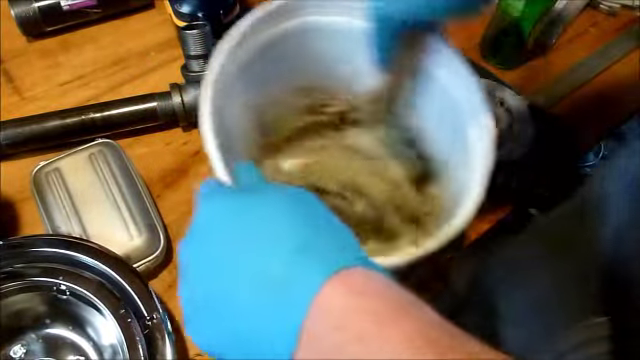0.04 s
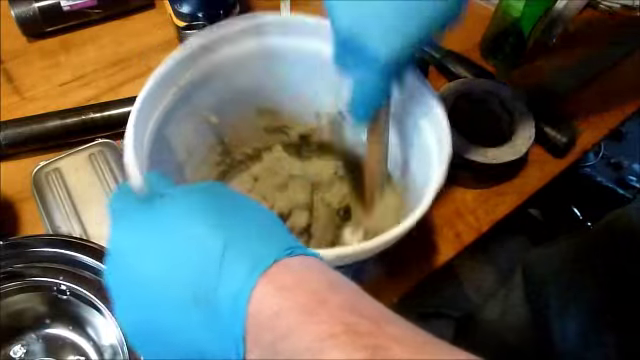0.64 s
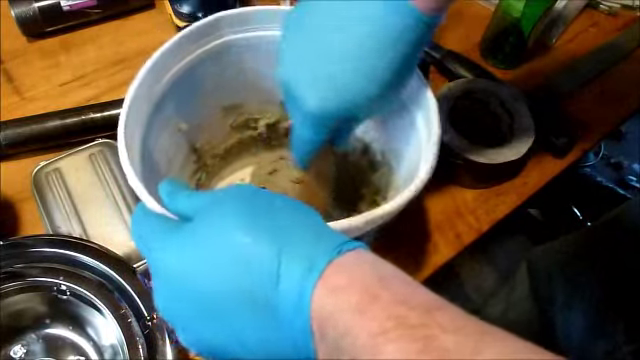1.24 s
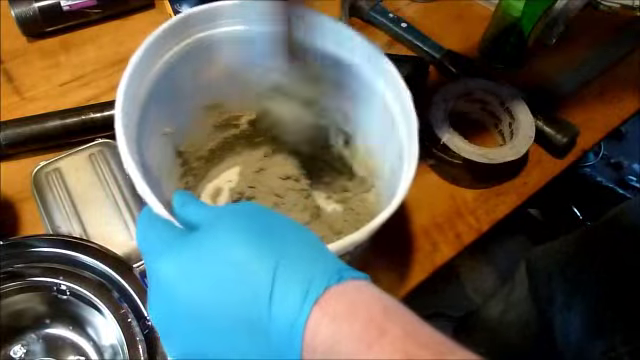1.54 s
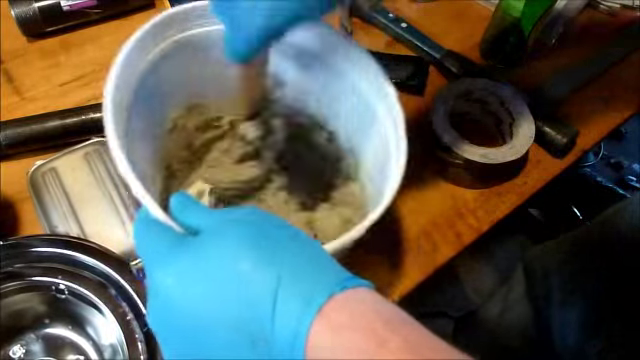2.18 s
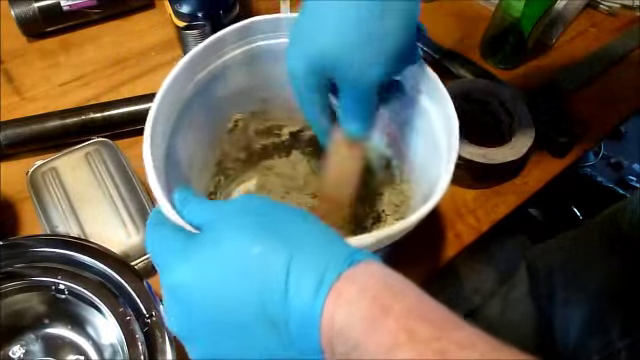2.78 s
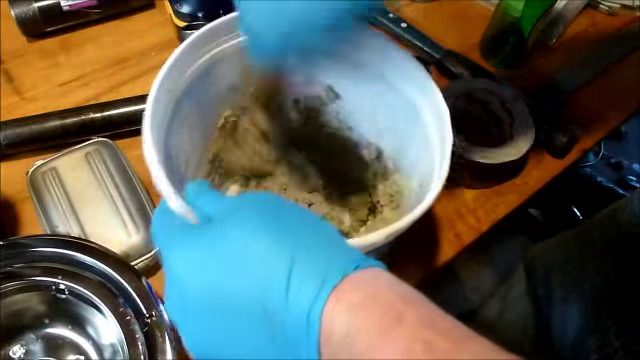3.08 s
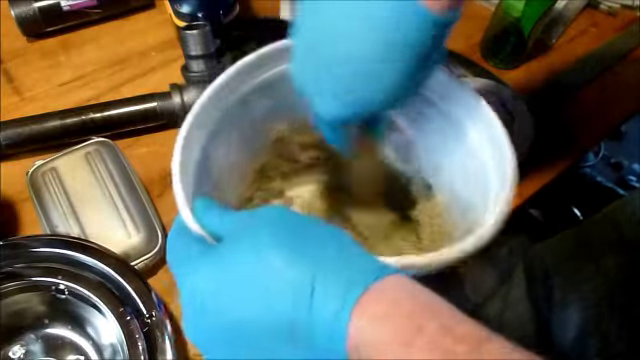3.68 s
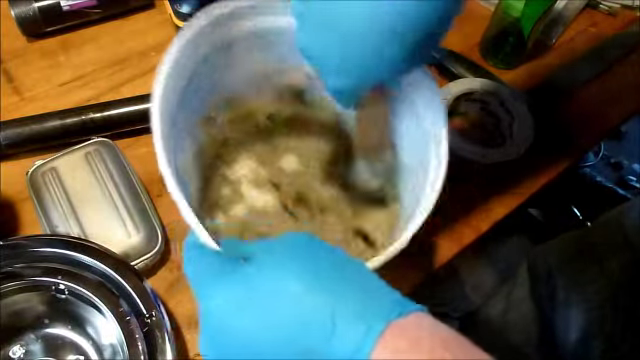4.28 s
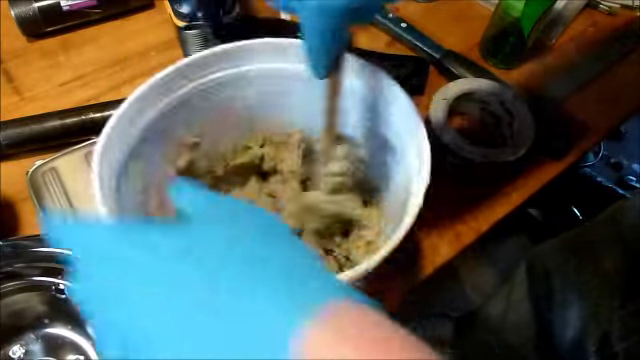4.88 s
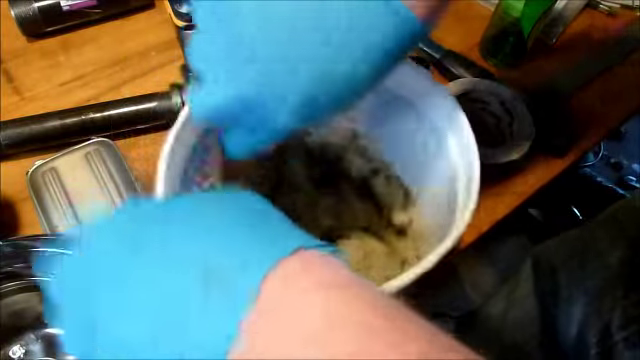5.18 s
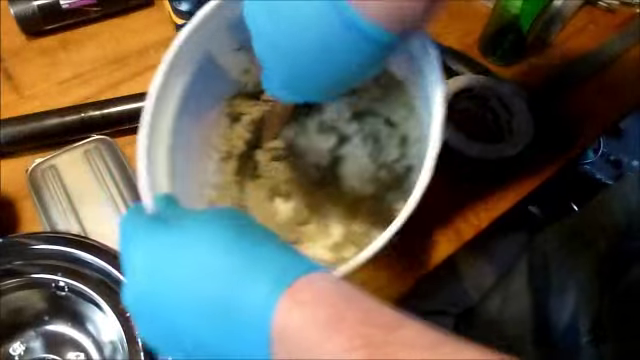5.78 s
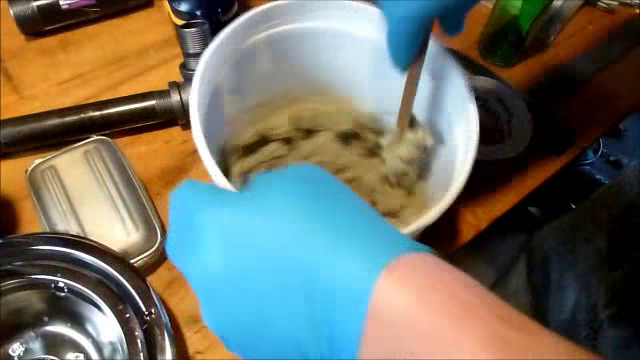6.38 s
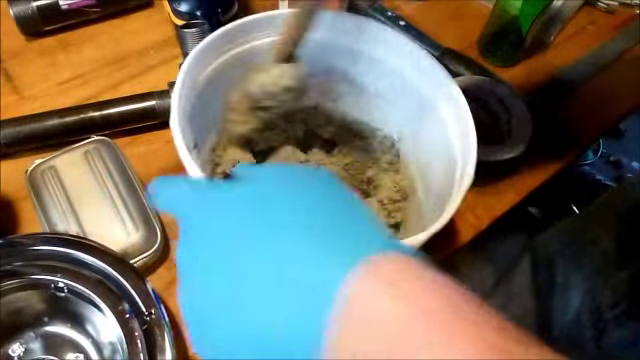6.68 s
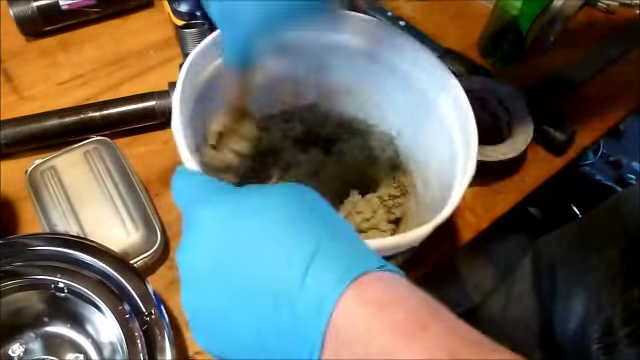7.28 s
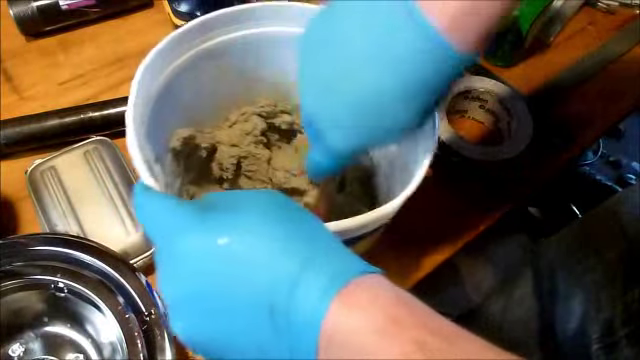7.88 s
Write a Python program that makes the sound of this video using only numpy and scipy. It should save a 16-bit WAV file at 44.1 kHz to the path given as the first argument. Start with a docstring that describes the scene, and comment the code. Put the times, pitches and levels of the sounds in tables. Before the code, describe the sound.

A wooden stick stirs wet clay in a hollow plastic tub, with gritty scraping, dull booms and irregular knocks against the sides.

```python
"""A wooden stick stirs wet clay in a plastic tub, held on a bench in a small, briefly echoing workshop.
From the start the stick catches and slips: gritty clay hisses along the wall and the hollow tub booms.
Soon knocks on the wall, ticks of grit and short groans join in, and they keep coming throughout.
Near 4.8 s comes a hard knock, and around 5.5 s the tub's base slaps the bench.
Another hard knock lands at 6.4 s, and a quick run of knocks fills the last of the eight seconds."""
import sys
import numpy as np
from scipy import signal
from scipy.fft import rfft, irfft
from scipy.io import wavfile
from scipy.ndimage import uniform_filter1d, map_coordinates

SR = 44100
rng = np.random.default_rng(int(sys.argv[2]) if len(sys.argv) > 2 else 0)


def master(y):
    """Save y as 16-bit WAV."""
    cut = np.clip(np.atleast_2d(y).T, -1, 1)
    pcm = np.round(cut * 32767)  # scale
    wavfile.write(sys.argv[1], SR, pcm.astype(np.int16))


N = 355005

# A mode is a note an object rings at. A t60 is the time a sound takes to fade by 60 dB.
# Knocks of the stick on the tub; booms() and clacks() shift the thud and clack levels further:
# start_s, boom_db, clack_db, thud_db (added to boom_db), ring_factor, boom_hz, wall_hz, contact_s
KNOCKS = [(0.222,-24.5,-37,6,1,350,2200,0.033), (0.675,-29,-27,4,.8,328,2150,0.026),
          (0.767,-20.5,-31,-7,0.54,338,1600,0.029), (0.893,-21.5,-33.5,4,1.4,386,1480,0.008),
          (1.009,-10,-22,1,1.9,335,3150,0.0052), (1.671,-12,-30,-2,1.44,381,2200,0.014),
          (2.362,-18.5,-42,-4,1.24,377,2400,0.023), (3.074,-25,-35,7.5,0.71,347,2100,.035),
          (3.196,-12.5,-33,-3,0.79,393,2900,.03), (3.58,-19.5,-33,-3,1.3,360,1490,0.04),
          (3.667,-16.5,-28.5,-9,0.97,377,3000,0.041), (3.876,-14,-44,-4.5,1.2,328,950,0.034),
          (4.477,-16.5,-42,0,1.4,358,2100,0.017), (4.7761,-1.5,-18,-8,1.66,350,2070,0.0084),
          (5.161,-20,-29,2.5,0.77,382,2500,0.056), (5.485,-13.5,-30,1.5,0.62,430,1400,0.022),
          (5.552,-17.5,-33,-4,0.59,444,1150,0.019), (6.3661,-8.5,-31.5,-23,1.4,380,2400,0.031),
          (6.4266,-1,-24.5,-7,0.78,350,1530,0.0058), (7.184,-21,-33.5,8,0.84,370,2200,0.028),
          (7.2496,-8.5,-25,-17,0.54,360,1150,0.0093), (7.498,-7,-28.5,-21,0.55,396,1150,0.018),
          (7.525,-4.5,-17,-12,0.64,367,2500,0.0081), (7.741,-10,-28,-8.5,0.73,320,1300,0.014),
          (7.876,-13,-24.5,-7,0.63,295,1620,0.013)]
# Modes of the clay-filled tub: pitch_hz, t60_s, level_db
TUB_MODES = [(222,0.045,-8), (254,0.048,-6.5), (298.6,0.033,1.5), (346,0.037,2.5), (379.3,0.049,4),
             (429.7,0.11,-9), (476.5,0.19,-9.5), (527.5,0.076,-19)]
# Modes of the bench top: pitch_hz, t60_s, level_db
BENCH_MODES = [(110, 0.063, -17), (133.7, 0.3, 2), (160.8, 0.12, 0)]
# Modes of the tub's thin wall: pitch_hz
WALL_MODES_HZ = [967, 1179, 1517, 1825, 2124, 2338, 2844, 3420, 4660, 5960, 6600]
# Tone colour of a clack on the wall: frequency_hz, level_db
CLACK_COLOUR = [(300, -24), (700, -0.5), (1100, 1.5), (1450, -0.5), (2400, -4.5), (3400, -2), (4500, -15.5),
                (8000, -41.5)]

TOP_HZ = 7800  # the finished sound is cut off above this


def undb(db):
    """Turn decibels into a number to multiply by."""
    return 10 ** (np.asarray(db) / 20)


def unit(x):
    """Scale a signal to an average strength (rms) of 1."""
    return x / np.sqrt(np.mean(x ** 2))


def seconds(length):
    """The time of each sample in a short sound."""
    return np.arange(int(length * SR)) / SR


def fade(t, t60):
    """Die away by 60 dB every t60 seconds."""
    return np.exp(-np.log(1000) * t / t60)


def add(track, start_s, sound):
    """Mix a sound into a track at a given time."""
    i = max(int(start_s * SR), 0)
    track[i:i + len(sound)] += sound[:max(N - i, 0)]


def through(x, response):
    """Pass a signal through an object, given that object's response to one click."""
    return signal.oaconvolve(x, response)[:len(x)]


def cut(x, order, hz, kind):
    """Keep the "low" part, the "high" part or a "band" of a sound."""
    return signal.sosfilt(signal.butter(order, hz, kind, fs=SR, output="sos"), x)


def colour(points, size=1024):
    """Turn a tone colour into a click response with energy 1."""
    hz, db = np.transpose(points)
    grid_hz = np.fft.rfftfreq(size, 1 / SR) + 1
    curve_db = np.interp(np.log(grid_hz), np.log(hz), db)
    cepstrum = irfft(np.log(undb(curve_db)))
    # folding the second half onto the first moves the energy to the start of the response
    cepstrum[1:size // 2] *= 2
    cepstrum[size // 2 + 1:] = 0
    response = irfft(np.exp(rfft(cepstrum)))
    return response / np.linalg.norm(response)


def ring(modes, stretch=0.69, push_s=0.0035):
    """A struck body's modes build up during the push, then fade; stretch multiplies their t60."""
    t = seconds(.4)
    y = sum(undb(db) * fade(t, t60 * max(stretch, .2)) * np.cos(2 * np.pi * hz * t)
            for hz, t60, db in modes)
    y *= 1 - np.exp(-t / push_s)
    y = cut(y, 3, 0.5 * modes[0][0], "high")  # little sound comes out below the lowest mode
    return y / np.abs(y).max()


def wander(per_s):
    """A curve that slides to a new random value per_s times a second; rms 1."""
    hold = int(SR / per_s)
    steps = np.repeat(rng.standard_normal(N // hold + 1), hold)
    return unit(uniform_filter1d(steps, hold)[:N])


def slips(per_s, spread_db):
    """Tiny slips, each a click of random time and size; rms 1."""
    size = undb(spread_db * np.minimum(rng.exponential(size=N), 5))
    return unit((rng.random(N) < per_s / SR) * size * rng.choice([-1, 1], N))


def burst(t60, tail_db, tail_t60):
    """Noise of one contact: the edge skids for a moment, then the wall shivers; energy 1."""
    t = seconds(.15)
    skid = fade(np.maximum(t - t60 / 6, 0), t60)
    shiver = undb(tail_db) * fade(t, tail_t60)
    y = rng.choice([-1, 1], len(t)) * (skid + shiver)
    return y / np.linalg.norm(y)


def glide(length, start_hz, end_hz, waver, per_s):
    """A tone that swells and fades, sliding in pitch and wavering as the grip changes."""
    t = seconds(length)
    hz = np.linspace(start_hz, end_hz, len(t)) * (1 + waver * wander(per_s)[:len(t)])
    swell = np.sqrt(np.abs(np.sin(np.pi * t / length)))
    return np.sin(2 * np.pi * np.cumsum(hz) / SR) * swell


def favour(hz, spot_hz, db_per_octave):
    """A mode's gain in dB: the further from the pitch of the struck spot, the weaker it rings."""
    return -db_per_octave * np.abs(np.log2(hz / spot_hz))


def workshop():
    """The quiet, steady air of the room."""
    # Tone colour of the room: frequency_hz, level_db
    air_colour = [(25, -24.5), (65, 7), (130, -2.5), (400, 8), (700, 6.5), (2000, 3.5), (8000, -48)]
    air = through(rng.standard_normal(N), colour(air_colour, size=4096))
    return air * undb(-51.5 + 0.25 * wander(23))


def echoes(x, t60, delay_s):
    """Blurred echoes from the bench and the workshop walls."""
    t = seconds(.5)
    response = rng.standard_normal(len(t)) * fade(t, t60) * (t > delay_s)
    return through(x, response / np.linalg.norm(response))


def rocking(t60=0.59):
    """How strongly the tub rocks: every knock starts it and the hand soon stills it."""
    out = np.zeros(N)
    for start_s, boom_db, _, thud_db, *_ in KNOCKS:
        add(out, start_s, undb(boom_db + thud_db - 26.5) * fade(seconds(t60), t60))
    return out


def rubs(fall=.06, width_hz=370):
    """The stick rubs a bare patch of wall, which sings hoarsely and drops in pitch as it moves on."""
    # Rubs on bare plastic: start_s, length_s, pitch_hz, level_db
    bare_rubs = [(2.155,.07,893,-47), (4.19,0.12,1690,-48), (4.26,0.08,860,-35), (4.795,0.084,702,-42.5),
                 (5.68,.12,1710,-44.5), (6.44,.06,942,-41), (7.527,0.024,642,-35), (7.63,0.057,966,-43.5)]
    out = np.zeros(N)
    for start_s, length, hz, db in bare_rubs:
        tone = glide(length, hz * (1 + fall), hz * (1 - fall), waver=.02, per_s=160)
        roughness = cut(rng.standard_normal(len(tone)), 2, width_hz / 2, "low")
        add(out, start_s, undb(db) * unit(tone * roughness))
    return out


def judders():
    """Slips fall in step with the tub's main mode and groan; on bare plastic they squeak."""
    # Groans of the tub: start_s, length_s, pitch_hz, level_db
    groans = [(0.501,0.027,381,-24.5), (1.524,0.026,385,-30.5), (1.895,0.026,391,-23),
              (2.963,0.012,374,-26), (3.269,0.04,382,-19), (3.905,0.047,368.3,-24.5), (5.612,.045,377,-23),
              (5.68,0.08,374,-19.5), (5.733,0.013,342,-15), (6.312,0.026,379,-24), (7.014,0.028,398,-27)]
    # Thin squeaks along the wall: start_s, length_s, start_hz, end_hz, level_db
    squeaks = [(4.422,0.031,7000,7600,-49), (6.657,0.086,6000,7570,-54)]
    out = np.zeros(N)
    for start_s, length, hz, db in groans:
        add(out, start_s, undb(db) * glide(length, hz * 1.017, hz / 1.005, waver=.02, per_s=140))
    for start_s, length, start_hz, end_hz, db in squeaks:
        add(out, start_s, undb(db) * glide(length, start_hz, end_hz, waver=.011, per_s=350))
    return out * undb(2 * wander(160))


def ticks():
    """Grit cracks under the stick and the thin wall snaps back."""
    # Sharp ticks of grit and bending plastic: start_s, peak_db, pitch_hz, t60_s
    cracks = [(0.203,-26,4000,.007), (1.639,-24,4040,0.0083), (1.6456,-21,3640,0.0088),
              (1.672,-20,4970,0.0067), (2.158,-30,1890,0.023), (2.427,-24.5,3330,0.0089),
              (3.629,-24,3540,0.0068), (3.799,-29,4800,0.0037), (4.016,-26.5,4260,.004),
              (4.776,-9.5,2030,0.005), (5.396,-30,2200,.015), (5.419,-28,2500,.022),
              (5.5645,-14.5,2700,.004), (5.577,-18.5,5360,0.0077), (5.591,-23,5550,0.0074),
              (5.629,-15,2580,0.0032), (5.8462,-8,5100,0.013), (6.742,-30,3450,0.035),
              (7.525,-12.5,5360,0.011)]
    out = np.zeros(N)
    for start_s, db, hz, t60 in cracks:
        noise = burst(t60, tail_db=-9.5, tail_t60=8 * t60)
        tick = cut(noise, 2, [hz / 1.28, min(hz * 1.176, TOP_HZ)], "band")
        add(out, start_s, undb(db) * tick / np.abs(tick).max())
    return out


def grit(per_s=65, low_hz=1340, high_hz=6300):
    """Single grains crack at random, each with its own pitch and size; rms 1."""
    out, t = np.zeros(N), seconds(.02)
    for when, pitch, chance in rng.random((int(per_s * N / SR), 3)):
        hz = low_hz * (high_hz / low_hz) ** pitch
        size = undb(-2.8 * np.log(max(chance, .02)))  # big grains are rare
        add(out, when * N / SR, size * fade(t, t60=0.01) * np.sin(2 * np.pi * hz * t))
    return unit(out)


def wall_ring(spot_hz, t60, detune=.05):
    """The wall rings briefly, retuned by the struck spot and loudest near its pitch; energy 1."""
    t = seconds(.15)
    pitches = WALL_MODES_HZ * (1 + detune * rng.uniform(-0.85, 1, len(WALL_MODES_HZ)))
    gains = undb(favour(pitches, spot_hz, db_per_octave=15))
    y = sum(gain * np.sin(2 * np.pi * (hz * t + rng.random())) for hz, gain in zip(pitches, gains))
    y *= fade(t, t60)
    return y / np.linalg.norm(y)


def clacks(ring_db=-3.5, snap_db=-9.5):
    """Wood hits thin plastic: a dry clack, a short ring and a snap, blurred when clay pads the blow."""
    # Tone colour of the bright snap: frequency_hz, level_db
    snap_colour = [(1500, -8), (3000, -2.5), (4000, -6), (5000, 2.5), (6300, -1), (8000, -23.5)]
    clack, rings, snap = np.zeros((3, N))
    for start_s, _, clack_db, _, _, _, wall_hz, contact_s in KNOCKS:
        force = undb(clack_db + 23)
        add(clack, start_s, force * burst(contact_s, tail_db=-15, tail_t60=.07))
        add(rings, start_s, force * undb(ring_db) * wall_ring(wall_hz, t60=0.026 + contact_s))
        add(snap, start_s, force * undb(snap_db) * burst(contact_s, tail_db=-16, tail_t60=0.025))
    return through(clack, colour(CLACK_COLOUR)) + rings + through(snap, colour(snap_colour))


def booms(hollow_top_hz=600):
    """Each knock booms in the hollow tub and thuds into the bench; now and then the base slaps down."""
    # Slaps of the tub's base on the bench: start_s, peak_db, pitch_factor
    slaps = [(4.783, -29, 1.07), (5.486, -12, .93), (5.506, -32, 0.85), (5.553, -20, 1.14)]
    # Modes of the base against the bench: pitch_hz, t60_s, level_db
    base_modes = [(98.5, 0.097, 0.5), (558, 0.036, 15), (688, 0.078, -5)]
    tub, bench = np.zeros((2, N))
    for start_s, boom_db, _, thud_db, stretch, boom_hz, _, contact_s in KNOCKS:
        struck = [(hz, t60, db + favour(hz, boom_hz, db_per_octave=23)) for hz, t60, db in TUB_MODES]
        boom = ring(struck, stretch, push_s=0.13 * contact_s)
        thud = ring(BENCH_MODES, stretch * 0.59, push_s=0.0079)
        add(tub, start_s + 0.0005, undb(boom_db) * boom)
        add(bench, start_s + 0.0018, undb(boom_db + thud_db - 20.5) * thud)
    for start_s, peak_db, pitch_factor in slaps:
        retuned = [(hz * pitch_factor, t60, db) for hz, t60, db in base_modes]
        add(bench, start_s, undb(peak_db) * ring(retuned))
    return cut(tub, 5, hollow_top_hz, "low") + bench


def stroke(length, attack_s, release_s, build_db=0):
    """The force of one stroke: it sets in, grows by build_db over its length and lets go."""
    t = seconds(length + 8 * release_s)
    onset = np.minimum(t / attack_s, 1)
    build = undb(build_db * np.minimum(t / length - 1, 0))
    return onset * build * np.exp(-np.maximum(t - length, 0) / release_s)


def stirring(skid_s=0.015):
    """How strong the boom, rasp and hiss are over time, as sweeps, pushes and skids add their power."""
    # Light sweeps along the smeared wall, about one a turn: start_s, length_s, hiss_db
    sweeps = [(0.0, 0.22, -45.5), (0.195, 0.43, -40.5), (0.646, 0.56, -48.5), (1.22, 0.3, -44.5),
              (1.648, 0.3, -43.5), (1.907, 0.51, -47), (2.355, 0.56, -45.5), (2.98, 0.23, -49.5),
              (3.195, 0.39, -44.5), (3.604, 0.35, -46.5), (3.943, 0.41, -47.5), (4.36, 0.71, -49),
              (5.133, 0.54, -45.5), (5.47, 0.468, -44.5), (5.863, 0.26, -50.5), (6.14, 0.55, -54),
              (6.69, 0.47, -42.5), (7.152, 0.21, -45.5), (7.365, 0.43, -48.5), (7.794, 0.25, -48.5)]
    # Hard pushes through the lump of clay: start_s, length_s, boom_db, rasp_db, hiss_db
    pushes = [(0.49, 0.18, -37.5, -41, -65), (0.763, 0.025, -37, -35, -43.5),
              (1.259, 0.039, -38.5, -45, -51), (1.63, 0.056, -37, -39, -36.5),
              (1.841, 0.088, -35, -40, -61), (2.42, 0.018, -39, -34, -31.5),
              (2.438, 0.062, -35.5, -42, -42), (3.182, 0.097, -30, -35.5, -35.5),
              (3.272, 0.046, -30, -34, -48), (3.39, 0.08, -35, -44, -41.5),
              (3.605, 0.083, -30.5, -37.5, -39), (3.722, 0.044, -33, -34, -47),
              (3.859, 0.067, -30.5, -40, -41), (4.225, 0.029, -31.5, -38.5, -36),
              (4.261, 0.078, -29.5, -38, -64), (4.421, 0.024, -36.5, -36, -48), (4.652, .11, -34, -37, -41),
              (4.821, 0.052, -27.5, -56, -56), (5.089, 0.11, -34.5, -40.5, -50),
              (5.474, 0.14, -31.5, -34, -37), (5.617, 0.17, -32, -39.5, -49),
              (6.244, 0.083, -34.5, -41.5, -51), (6.355, 0.12, -30, -38, -47),
              (6.524, 0.04, -43, -43.5, -44.5), (7.433, 0.07, -31.5, -37, -39),
              (7.607, 0.073, -33.5, -41, -45.5), (7.868, 0.015, -26, -37, -35)]
    # the stick never quite stops between strokes
    boom, rasp, hiss = (np.full(N, undb(db) ** 2) for db in (-43.5, -54, -58.5))
    for start_s, length, hiss_db in sweeps:
        force = stroke(length, attack_s=.07, release_s=.028)
        for power, db in ((boom, hiss_db - 2), (rasp, hiss_db - 3.5), (hiss, hiss_db)):
            add(power, start_s, (undb(db) * force) ** 2)
    for start_s, length, boom_db, rasp_db, hiss_db in pushes:
        # clay piles up in front of the stick until it gives way
        force = stroke(length, attack_s=0.016, release_s=0.023, build_db=1.5)
        for power, db in ((boom, boom_db), (rasp, rasp_db), (hiss, hiss_db)):
            add(power, start_s, (undb(db) * force) ** 2)
    skid = stroke(skid_s, attack_s=skid_s, release_s=0.023)  # the stick skids into each knock
    for start_s, _, clack_db, *_ in KNOCKS:
        add(rasp, start_s - skid_s, (undb(clack_db - 11) * skid) ** 2)
    return np.sqrt([boom, rasp, hiss])


def wall(scrape, swing_db=3):
    """Each wall mode swells and shrinks as the stick passes its still points and clay muffles it."""
    out = scrape
    for hz in WALL_MODES_HZ:
        mode = signal.lfilter(*signal.iirpeak(hz, Q=17, fs=SR), scrape)
        out = out + mode * (undb(swing_db * wander(14)) - 1)
    return out * undb(-1)


def scraping(grip, rasp_gain, hiss_gain, crumbs):
    """Coarse slips rasp, crumbs crack and fine grit hisses, harder as the stick grips; grains tick."""
    # Tone colour of the coarse rasp: frequency_hz, level_db
    rasp_colour = [(200, -16.5), (500, 4), (720, 1), (1050, 5), (1500, 2), (2300, 2), (3200, -6.5),
                   (4500, -12.5), (8000, -44)]
    # Tone colour of the fine hiss: frequency_hz, level_db
    hiss_colour = [(1200, -29.5), (2500, 7.5), (3400, 8.5), (4300, 9), (5500, 9), (6700, 7), (7500, 0.5),
                   (8200, -48)]
    coarse = through(slips(per_s=3500, spread_db=-0.5), colour(rasp_colour))
    coarse += undb(-10.5) * through(crumbs, colour(CLACK_COLOUR))
    fine = through(slips(per_s=10000, spread_db=3), colour(hiss_colour))
    rasp = coarse * rasp_gain * undb(0.8 * grip - 1)
    hiss = fine * hiss_gain * undb(1.3 * grip - 1)
    grains = undb(-16) * grit() * np.hypot(rasp_gain, hiss_gain)
    return rasp + hiss + grains


def dragging(boom_gain, drift=0.011):
    """The slipping stick keeps the tub booming, while the tub rubs and rocks on the bench."""
    boom = unit(through(slips(per_s=1500, spread_db=1), ring(TUB_MODES, stretch=1.15)))
    read_position = np.cumsum(1 + drift * wander(8))  # shifting clay bends the tub's pitch
    boom = map_coordinates(boom, [read_position], order=1, mode="mirror")
    shuffle = unit(through(slips(per_s=1400, spread_db=-0.5), ring(BENCH_MODES)))
    rubbing = np.hypot(boom_gain * undb(-20.5), undb(-56))  # follows the boom, plus a steady part
    return boom * boom_gain * undb(-0.37) + shuffle * np.hypot(rubbing, rocking())


def scene():
    """The boom sits in the centre; high sounds scatter off the tub and reach each side differently."""
    grip = wander(70)  # the stick catches and lets go in the lumps
    boom_gain, rasp_gain, hiss_gain = stirring()
    crumbs = slips(per_s=100, spread_db=2.2)
    low = dragging(boom_gain) + booms() + judders()
    bright, scattered = (wall(scraping(grip, rasp_gain, hiss_gain, crumbs)) + clacks() + ticks() + rubs()
                         for _ in range(2))
    scattered = cut(scattered, 1, 1000, "high")
    mid = low + undb(-12.5) * echoes(low, t60=0.41, delay_s=0.011) + bright + workshop()
    side = undb(-24.5) * echoes(low, t60=.25, delay_s=.003)
    side += undb(-7.5) * scattered + undb(-4) * workshop()
    return np.array([mid + side, mid - side]) * undb([[-.2], [.2]])


def record(dry):
    """The recorder rounds off the loudest peaks and cuts the highest sounds."""
    rounded = 0.85 * np.tanh(1.4 * dry)
    return signal.sosfilt(signal.ellip(8, .2, 70, TOP_HZ, fs=SR, output="sos"), rounded)


dry = scene()
out = record(dry)
master(out)
```